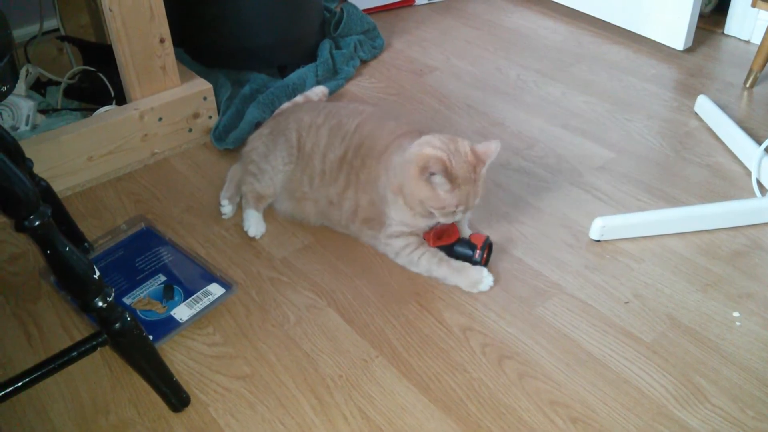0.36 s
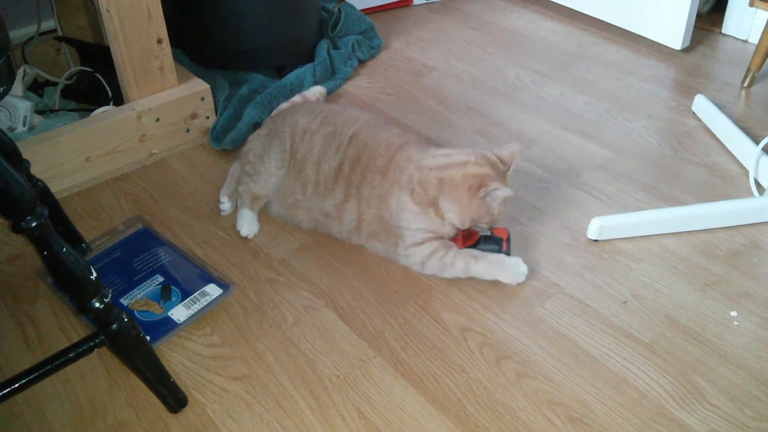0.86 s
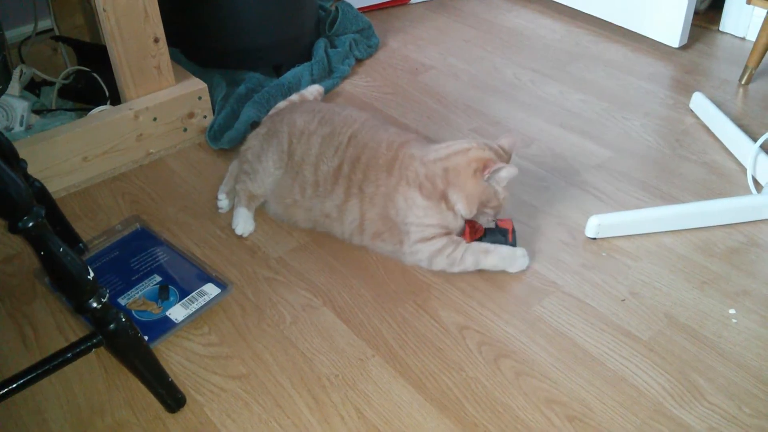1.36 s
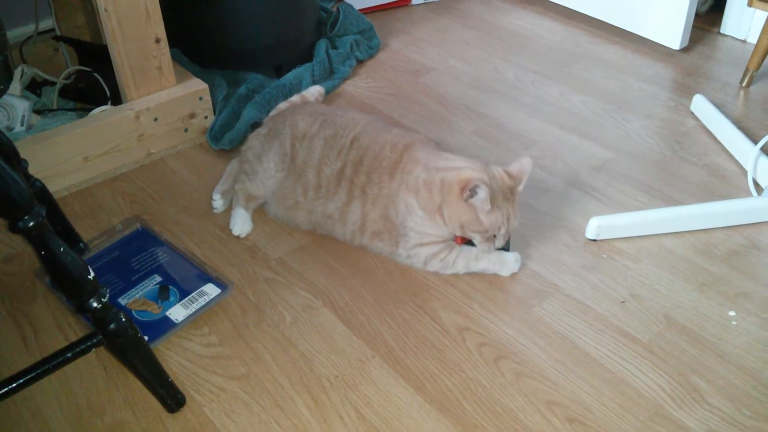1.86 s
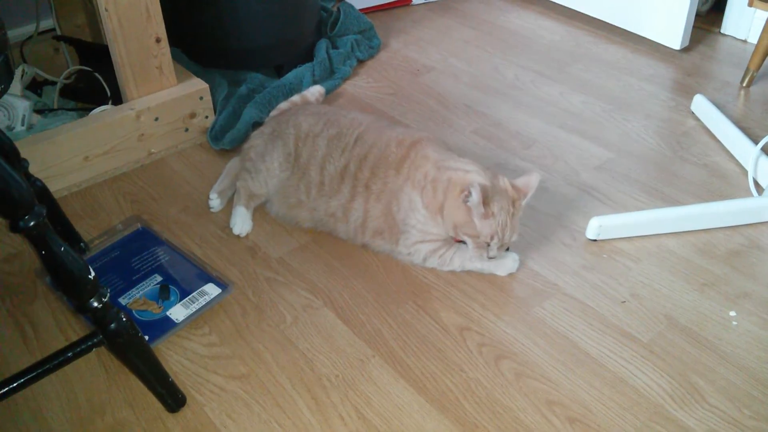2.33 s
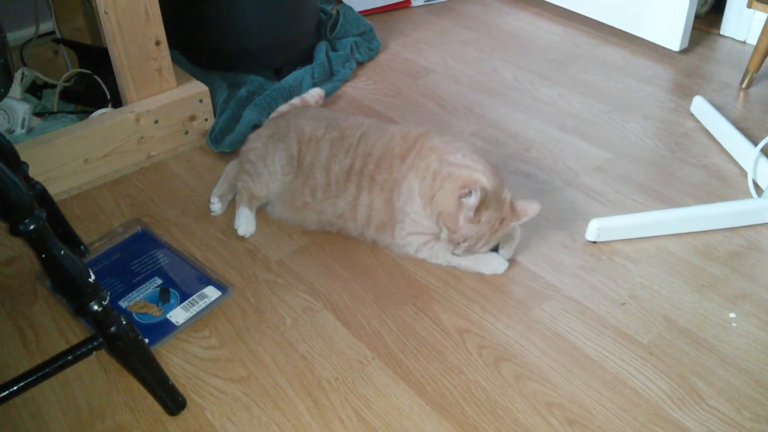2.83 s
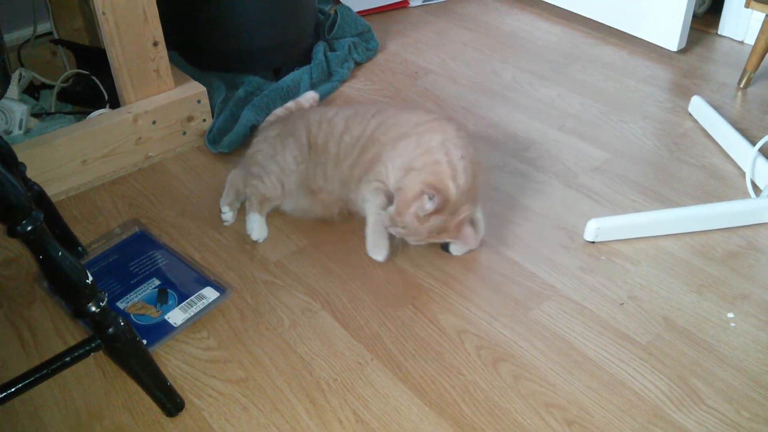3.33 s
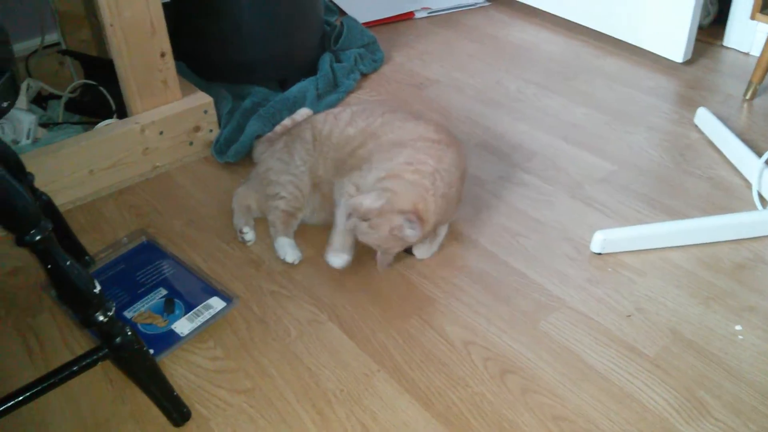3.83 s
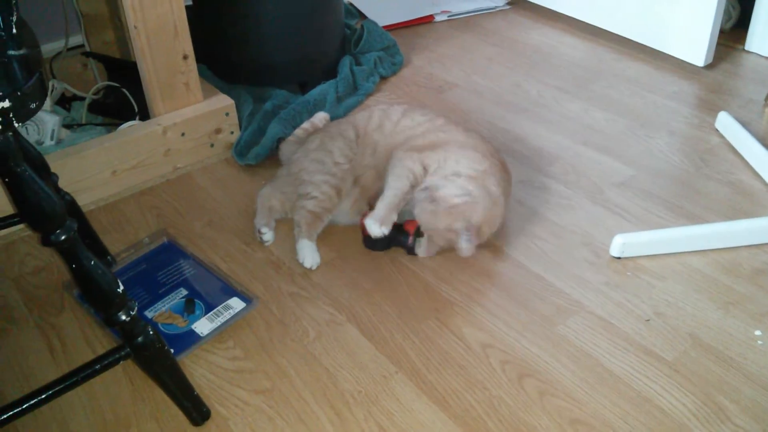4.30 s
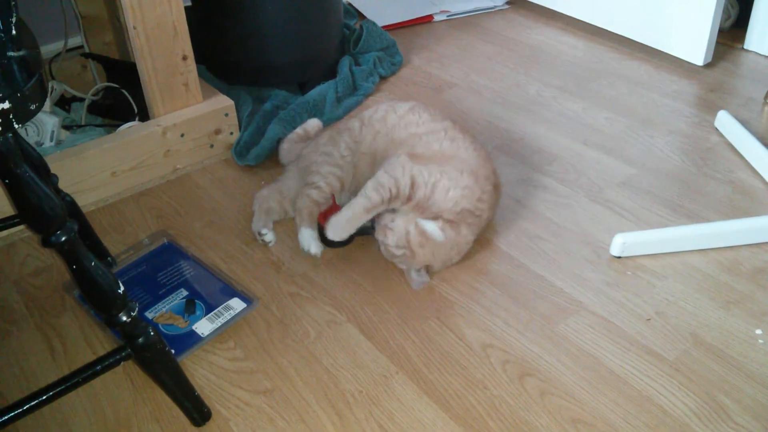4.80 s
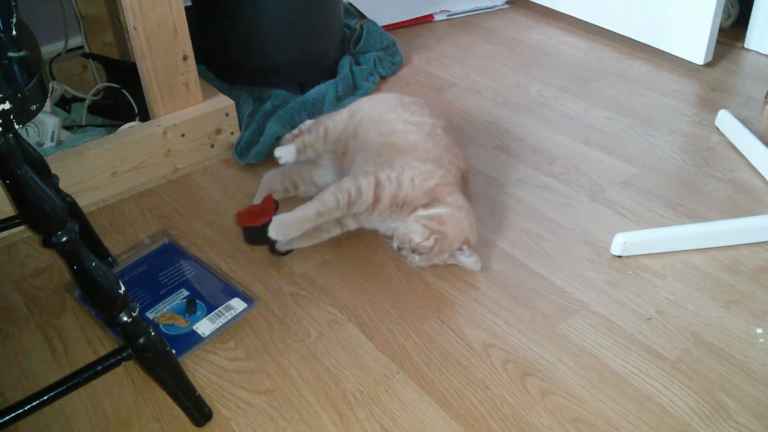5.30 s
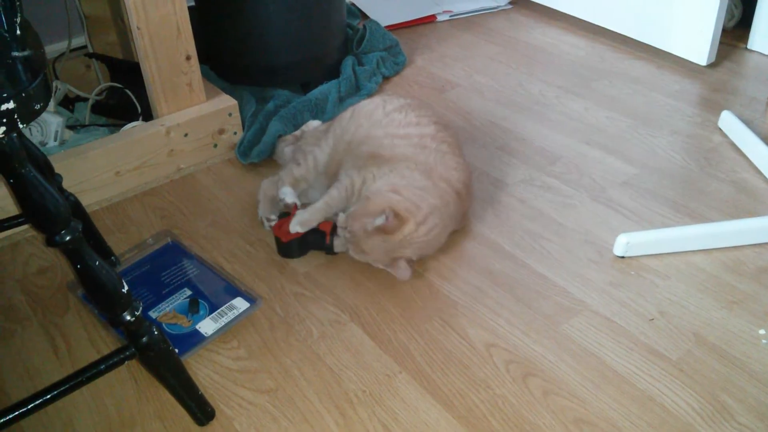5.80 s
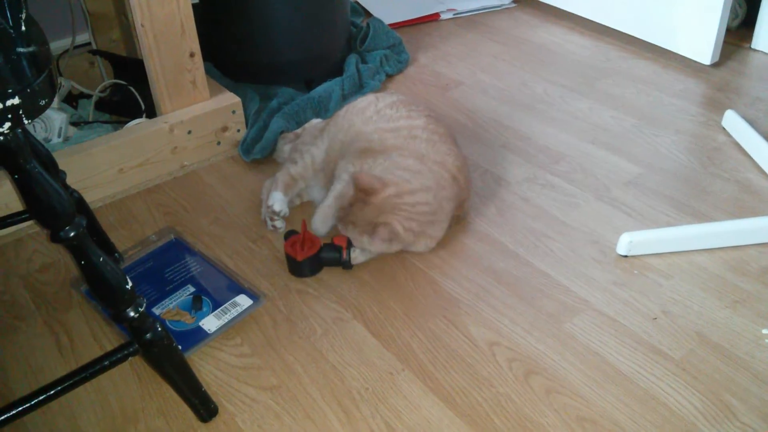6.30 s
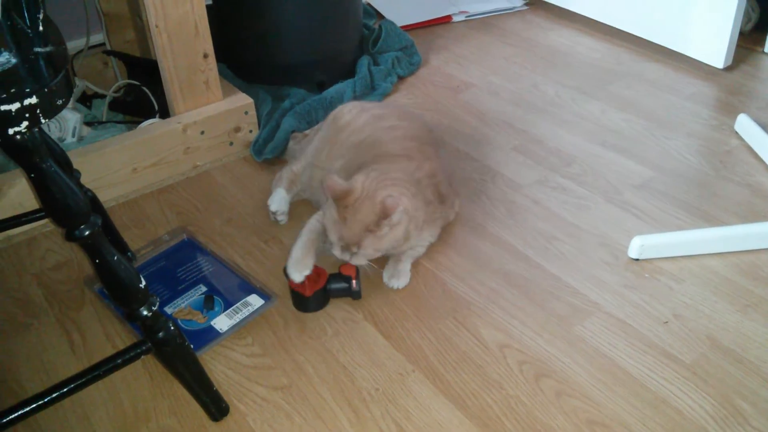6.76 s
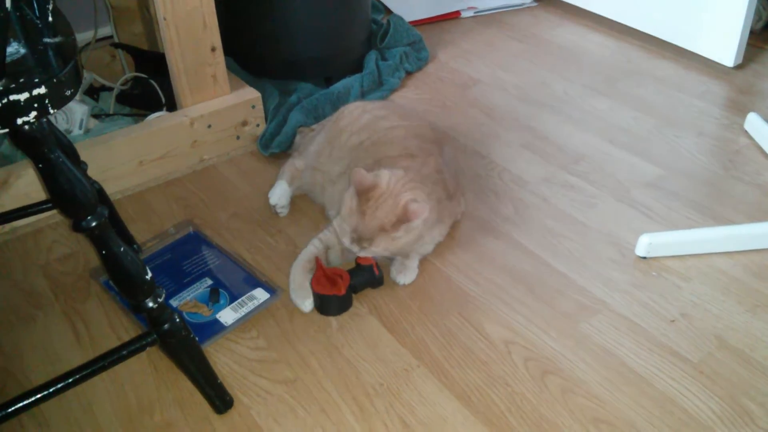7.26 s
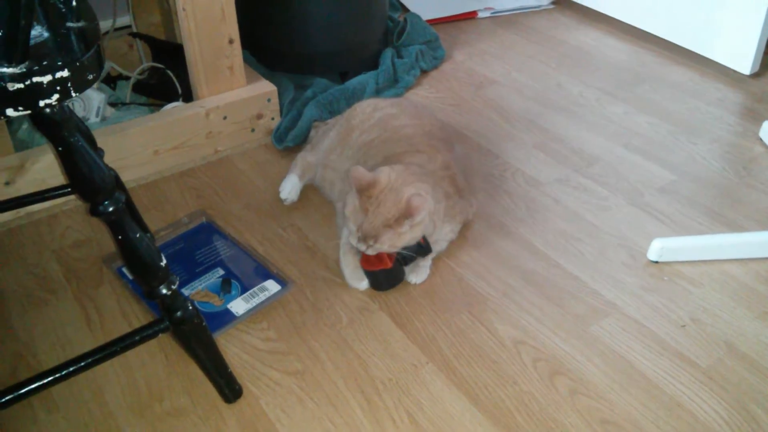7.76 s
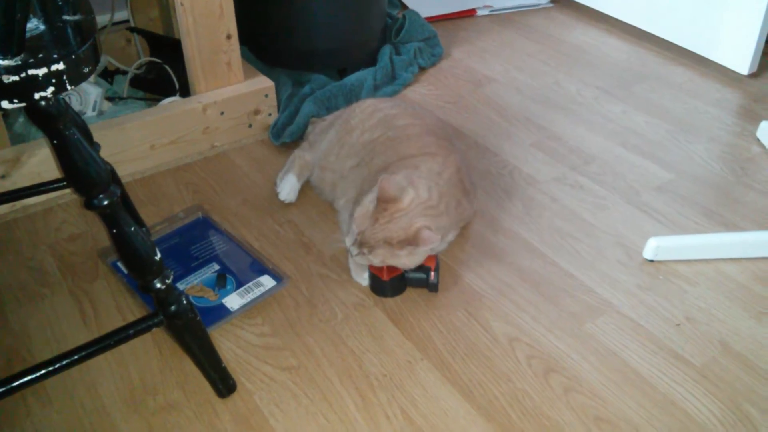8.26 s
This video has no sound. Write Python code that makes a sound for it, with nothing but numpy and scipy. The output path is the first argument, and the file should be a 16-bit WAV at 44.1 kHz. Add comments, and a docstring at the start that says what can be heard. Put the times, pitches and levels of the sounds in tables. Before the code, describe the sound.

A cat paws a hollow plastic valve on a laminate floor. Quiet lumpy room hum and soft scrapes come first, with a few light clacks and thin squeaks. After a lull, knocks and drags return, crowding into a loud rattling tumble midway, then spacing out until one hard closing clack. Small, lively room, picked up close by a handheld phone with faint low bumps.

```python
"""A quiet, lumpy household hum with a soft scrape comes first, then knocks, rattles and more dragging:
a cat nudges, paws and rolls a hollow plastic valve over a laminate floor in a small, lively room.
Knocks and dragging ring the boards and the bore of the valve (low modes) and its shell (high modes).
Dense, fading noise stands for the room's answer. A few thin squeaks join in,
and the hand bumps the phone now and then, as short, low, dying tones."""
import sys
import numpy as np
from scipy import signal
from scipy.fft import rfft, irfft
from scipy.io import wavfile
from scipy.ndimage import uniform_filter1d

SR = 44100
rng = np.random.default_rng(int(sys.argv[2]) if len(sys.argv) > 2 else 0)


def ratio(d):
    """dB to gain"""
    e = np.asarray(d, float) / 20
    return 10 ** e


def to_wav(s):
    """Save 16-bit WAV."""
    ch = np.atleast_2d(s).T  # columns
    pcm = np.round(np.clip(ch, -1, 1) * 32767)  # PCM
    wavfile.write(sys.argv[1], SR, pcm.astype(np.int16))


N = 369488
TIME = np.arange(N) / SR

# All levels in the tables are relative, ahead of the filters and the final gain.
# Colour of the household hum: f/Hz, level/dB
HUM_COLOUR = [(15, -43), (25, -10), (134, -2), (236, 6), (439, -14.5), (531, -0.5), (775, -10), (863, -11),
              (1160, -7.5), (2760, -41), (3920, -68), (5140, -29), (8360, -32.5), (14800, -35.5),
              (16000, -37)]
# Hand against phone: t/s, level/dB before the decay, f/Hz
HAND_BUMPS = [(1.719, -42, 59), (3.559, -48, 60), (7.55, -31, 60.3)]
# How the room answers in each band: f/Hz, time to fade by 60 dB/s, level/dB
ROOM_BANDS = [(151, 0.53, -8.5), (400, 0.34, 0.5), (935, 0.31, 0), (2500, 0.28, -12.5), (5000, 0.41, -4),
              (8660, 0.87, -21.5), (14200, 0.22, -25)]
# Plastic sticking on the varnish: start t/s, length/s, f/Hz, level/dB
SQUEAK_EVENTS = [(0.78, 0.066, 1950, -67), (0.938, 0.043, 1935, -49.5), (1.11, 0.036, 2050, -50),
                 (6.12, 0.11, 1700, -52)]
# Drags: strongest moment t/s, rise/s, fall/s (each spans 20 dB), boards level/dB, shell level/dB
SCRAPE_EVENTS = [(0.0, .05, 0.1, -45.5, -64), (0.581, 0.025, 0.23, -52, -67),
                 (.79, 0.035, 0.073, -47.5, -52.5), (.98, .05, 0.12, -50, -55),
                 (1.16, 0.064, 0.039, -45.5, -65), (1.23, 0.041, 0.12, -44, -70),
                 (1.42, 0.047, 0.08, -40, -54), (1.72, 0.015, 0.067, -69, -90), (2.95, 0.21, 0.1, -59, -75),
                 (3.211, 0.054, 0.099, -50, -57), (3.29, 0.085, .12, -41, -57.5),
                 (3.62, 0.18, 0.17, -38.5, -47), (3.87, 0.082, 0.07, -45, -59.5),
                 (4.09, 0.054, 0.037, -50, -74), (4.33, 0.13, 0.087, -46.5, -67),
                 (4.409, 0.025, .04, -31, -42.5), (4.49, 0.049, 0.17, -31.5, -49),
                 (4.59, 0.056, 0.058, -38, -59), (4.738, 0.13, 0.071, -32.5, -39),
                 (4.93, 0.2, 0.053, -48, -67), (5.12, 0.044, 0.043, -30, -38.5),
                 (5.158, 0.028, 0.048, -18.5, -29.5), (5.2, .03, 0.065, -27, -36),
                 (5.299, 0.041, 0.093, -22.5, -32), (5.38, 0.061, 0.056, -41.5, -47),
                 (5.549, 0.099, 0.13, -35.5, -47), (5.69, 0.11, 0.15, -37.5, -43),
                 (5.92, 0.069, 0.051, -43.5, -56.5), (6.17, 0.16, 0.13, -50, -65),
                 (6.49, 0.072, 0.082, -40, -46), (6.719, 0.058, 0.15, -39.5, -41),
                 (6.99, 0.048, 0.13, -33.5, -46.5), (7.442, 0.041, 0.087, -40, -46.5),
                 (7.621, 0.039, 0.073, -38.5, -54.5), (7.68, 0.05, 0.098, -35.5, -50),
                 (7.96, 0.045, 0.091, -55, -66), (8.218, 0.017, 0.08, -33.5, -29)]
# Constant shuffling: boards level/dB, shell level/dB, hiss level/dB
SHUFFLE_DB = (-60.5, -79, -71.5)
# Knocks: t/s, shell level/dB, boards level/dB, crack level/dB, favoured shell f/Hz
KNOCKS = [(0.5464, -69, -35, -69, 2500), (0.591, -32, -47, -66, 5770), (0.776, -32, -59, -39, 5100),
          (0.9457, -55, -31, -52, 2930), (0.989, -22, -54, -39, 5640), (1.1764, -14, -59, -40, 5560),
          (1.3901, -14.5, -52, -38, 5330), (1.4104, -26, -23, -57, 5480), (1.711, -64, -45, -71, 4510),
          (1.8264, -71, -44, -71, 5330), (1.9536, -50, -36.5, -58, 5970), (3.298, -56, -47, -58, 4320),
          (3.5654, -43, -22.5, -40, 4910), (3.6227, -28, -40, -26, 5090), (3.6986, -30.5, -49, -51, 4860),
          (4.2741, -53, -25, -61, 4740), (4.3968, -13.5, -8, -46, 5500), (4.4593, -24, -20, -49, 5570),
          (4.4706, -15, -11, -49, 3000), (4.5064, -25, -35, -58, 2980), (4.5976, -30, -34, -58, 5320),
          (4.7583, -19, -13.5, -65, 2980), (4.8948, -38, -32, -32.5, 5370), (4.9086, -45, -29.5, -62, 3020),
          (5.0904, -22.5, -32, -36, 5610), (5.1394, 1, 2.5, -11, 2870), (5.1696, -11, -31, -38, 4280),
          (5.2194, -19, -35, -14, 4690), (5.2732, -8, -9.5, -33, 3180), (5.2933, -15, -15, -25, 5650),
          (5.5074, -36, -29, -50, 5030), (5.5249, -21.5, -17.5, -57, 3020), (5.5602, -32, -45, -51, 5780),
          (5.575, -21, -36, -26, 5750), (5.5895, -34, -21.5, -48, 5470), (5.66, -28, -19.5, -55, 4630),
          (5.7597, -15, -48, -26, 5870), (6.2194, -53, -53, -61, 5640), (6.2778, -38.5, -47, -37, 5550),
          (6.411, -64, -26, -56, 5440), (6.4531, -29, -36, -31, 5540), (6.597, -24.5, -54, -57, 3970),
          (6.6787, -30, -19.5, -31, 4760), (6.6907, -23.5, -25.5, -26, 4690), (6.9538, -61, -20, -55, 5430),
          (6.9765, -40, -17, -30, 5500), (6.9986, -25.5, -29, -38, 3030), (7.3862, -24.5, -17.5, -31, 4340),
          (7.5547, -58, -44, -38, 4680), (7.5937, -58, -29.5, -47, 5460), (7.6168, -41, -42, -39, 4060),
          (7.6466, -23, -13.5, -50, 4900), (7.7627, -39, -34, -62, 5000), (7.9394, -59, -34, -63.5, 2740),
          (8.1985, 1, 3, -5, 3950)]
# How the valve lies: t/s, favoured low f/Hz, share spilling to the other board modes [ratio]
VALVE_POSE = [(0, 576, 0.28), (0.3, 400, 0.33), (0.56, 630, 0.14), (1.0, 563, 0.12), (1.17, 410, 0.088),
              (1.36, 410, 0.1), (1.42, 676, 0.16), (1.6, 503, 0.43), (3.0, 398, 0.38), (3.3, 600, 0.07),
              (3.6, 770, 0.073), (3.85, 584, 0.066), (4.6, 536, 0.13), (4.75, 400, 0.081), (5.05, 330, .2),
              (5.14, 730, 0.96), (5.27, 746, 0.86), (5.3, 490, 0.65), (5.6, 530, 0.22), (5.9, 510, 0.055),
              (6.15, 418, 0.14), (6.45, 520, 0.081), (6.7, 586, 0.11), (7.0, 477, 0.16), (7.36, 500, 0.14),
              (7.4, 760, 0.15), (7.46, 580, 0.21), (7.649, 517, 0.04), (8.1, 497, 0.15), (8.2, 513, 0.32)]
# Ringing of the boards and the bore: f/Hz, level/dB, time to fade by 60 dB/s
BOARD_MODES = [(197, -37, 0.035), (234, -1.5, 0.19), (330.5, -13, 0.072), (394.5, -2.5, 0.097),
               (463.4, -0.5, 0.074), (534.2, 5.5, 0.037), (609, 5, 0.043), (691, 3, 0.051),
               (751.6, 4.5, 0.044), (877, 12.5, 0.025), (1091, 4, 0.021), (1332, 1.5, 0.016),
               (1513, 1, 0.02), (1680, -0.5, 0.014), (1840, -12.5, 0.021), (2050, -41, 0.022)]
# Ringing of the plastic shell: f/Hz, level/dB, time to fade by 60 dB/s
SHELL_MODES = [(2730, -9, 0.031), (3042, -12.5, 0.066), (3322, 0, 0.012), (3665, -7, 0.028),
               (4024, -1, 0.023), (4350, 3.5, 0.014), (4680, 3.5, 0.02), (4997, 10, 0.0072),
               (5285, 5.5, 0.014), (5615, 10.5, 0.0083), (5980, -6, 0.029), (6220, -14.5, 0.021)]
# Very short ringing of the cracking edge: f/Hz, level/dB, time to fade by 60 dB/s
CRACK_MODES = [(8200, 1.5, 0.0018), (8770, 10, 0.0021), (10340, 12, 0.0011), (10700, -31, 0.0034),
               (13000, -30, .0025), (14800, -30, 0.0031)]


def set_rms(x, db):
    """Scale a sound to an rms level in dB."""
    return x * ratio(db) / np.sqrt(np.mean(x ** 2))


def walk(rate):
    """Slow random drift: levels held 1 / rate s and smoothed twice; spread near 1."""
    hold = int(SR / rate)
    steps = np.repeat(rng.standard_normal(N // hold + 1), hold)
    return 1.414 * uniform_filter1d(uniform_filter1d(steps, hold), hold)[:N]


def dull(x, hz):
    """Low-pass filter: takes away the sound above hz."""
    return signal.sosfilt(signal.butter(3, hz, fs=SR, output="sos"), x)


def hum():
    """Third-octave bands of household noise; the low-middle ones come in short lumps."""
    f = np.maximum(np.fft.rfftfreq(N, 1 / SR), 1)
    colour_hz, colour_db = np.transpose(HUM_COLOUR)
    colour = ratio(np.interp(np.log(f), np.log(colour_hz), colour_db))
    spectrum = rfft(rng.standard_normal(N)) * colour
    edges = 20 * 2 ** (np.arange(31) / 3)
    out, swell = 0, walk(2.36)  # all bands share the swell
    for lo, hi in zip(edges[:-1], edges[1:]):
        band = irfft(spectrum * ((f >= lo) & (f < hi)), N)
        lumps_db = 3.0 if 150 < lo < 2000 else 0.8
        out = out + band * ratio(lumps_db * walk(16) + 0.38 * swell)
    return set_rms(out, -51.5)


def bumps():
    """Dull thumps through the phone's case: low tones that die away at once."""
    out = np.zeros(N)
    for start_s, db, hz in HAND_BUMPS:
        t = np.maximum(TIME - start_s, 0)
        out += ratio(db) * np.sin(2 * np.pi * hz * t) * np.exp(-t / 0.011)
    return out


def room(x, gap_s, fill_s):
    """Dense reflections that start after a short gap, fill in and die away band by band."""
    t = np.arange(int(.6 * SR)) / SR
    f = np.maximum(np.fft.rfftfreq(len(t), 1 / SR), 1)
    centres = np.log(np.array(ROOM_BANDS)[:, 0])
    fill = 1 - np.exp(-np.maximum(t - gap_s, 0) / fill_s)
    tail = 0
    for k, (_, t60, db) in enumerate(ROOM_BANDS):
        # neighbouring bands cross-fade in power
        share = np.sqrt(np.interp(np.log(f), centres, np.eye(len(ROOM_BANDS))[k]))
        band = irfft(rfft(rng.standard_normal(len(t))) * share, len(t))
        shape = 10 ** (-3 * t / t60) * fill
        tail = tail + ratio(db) * band * shape / np.sqrt(np.sum(shape ** 2))
    return signal.fftconvolve(x, tail)[:N]


def squeaks():
    """Brief thin squeaks as plastic sticks on the varnish: swelling tones of wavering pitch."""
    out = np.zeros(N)
    wobble = np.cumsum(0.0253 * walk(120)) / SR  # time slips, so the pitch wavers
    for start_s, length, hz, db in SQUEAK_EVENTS:
        swell = np.sin(np.pi * ((TIME - start_s) / length).clip(0, 1))
        out += ratio(db) * swell * np.sin(2 * np.pi * hz * (TIME + wobble))
    return out


def knock_samples():
    """Sample number of each knock."""
    return (np.transpose(KNOCKS)[0] * SR).astype(int)


def rubbing(scrape_db, knock_db, shuffle_db):
    """Strength of rubbing: scrapes swell and fade, knocks chatter on, shuffling never rests."""
    roundness = 1.3  # 1 = pointed swell, 2 = bell
    rattle_db, rattle_s = -20, 0.011  # chatter against the knock's level; its decay time
    out = ratio(shuffle_db + 4.8 * walk(8))
    for (peak_s, rise, fall, *_), db in zip(SCRAPE_EVENTS, scrape_db):
        away = np.where(TIME < peak_s, (peak_s - TIME) / rise, (TIME - peak_s) / fall)
        out = out + ratio(db - 20 * away.clip(0, 9) ** roundness)
    chatter = np.zeros(N)
    chatter[knock_samples()] = ratio(knock_db + rattle_db)
    return out + signal.lfilter([1], [1, -np.exp(-1 / (rattle_s * SR))], chatter)


def grit(rate, spread_db):
    """Stick-slip: rate tiny catches a second, of either sign, a few much larger; rms 1."""
    size = rng.standard_normal(N) * ratio(spread_db * rng.exponential(size=N))
    return set_rms(size * (rng.random(N) < rate / SR), 0)


def near(hz, centre_hz, octaves):
    """Share of a push that reaches a mode, by its distance in pitch from where the contact favours."""
    return np.exp(-.5 * (np.log2(hz / centre_hz) / octaves) ** 2)


def upper_share(hz, hardness):
    """Hard contact, which favours the shell, also wakes the upper board modes."""
    return 1.69 * np.minimum(hardness, 1) * near(hz, 1700, octaves=0.63)


def ring(force, hz, t60):
    """One decaying mode; a unit push starts a unit swing."""
    r, w = np.exp(-np.log(1000) / (t60 * SR)), 2 * np.pi * hz / SR
    return signal.lfilter([0, np.sin(w)], [1, -2 * r * np.cos(w), r * r], force)


def body(modes, knock_db, knock_share, rub, rub_share, patchy_db):
    """Knocks and rubbing push one set of modes; each knock lands elsewhere, so signs and sizes change."""
    hz, db, t60 = np.transpose(modes)
    at = knock_samples()
    luck = rng.standard_normal((len(at), len(hz)))
    sign = np.sign(rng.standard_normal((len(at), len(hz))))
    push = knock_share * ratio(db + 2.0 * luck) * sign
    push = push * (ratio(knock_db) / np.sqrt(2 * np.sum(push ** 2, axis=1)))[:, None]
    energy = t60 * SR / (4 * np.log(1000))  # of a unit ring
    total = np.sqrt(sum(ratio(2 * db[m]) * energy[m] * rub_share(hz[m]) ** 2 for m in range(len(hz))))
    out = 0
    for m in range(len(hz)):
        patchy = ratio(db[m] + patchy_db * walk(25))
        force = rub * patchy * rub_share(hz[m]) / total
        force[at] += push[:, m]
        out = out + ring(force, hz[m], t60[m])
    return out


def valve():
    """Boards and bore thud, the shell clacks, the edge cracks; dragging excites all three."""
    _, shell_db, boards_db, crack_db, shell_hz = np.transpose(KNOCKS)
    low_db, mid_db = np.transpose(SCRAPE_EVENTS)[3:]
    pose_s, pose_hz, pose_share = np.transpose(VALVE_POSE)
    low_hz = np.interp(TIME, pose_s, pose_hz)
    spill = np.interp(TIME, pose_s, pose_share)
    at = knock_samples()[:, None]
    coarse, fine = grit(2500, spread_db=2.5), grit(9000, spread_db=1.0)
    low = rubbing(low_db, boards_db, SHUFFLE_DB[0])
    mid = rubbing(mid_db, shell_db, SHUFFLE_DB[1])
    hiss = rubbing(-27.5 + .65 * mid_db, crack_db, SHUFFLE_DB[2])  # hiss follows the shell's scrapes

    board_hz = np.array(BOARD_MODES)[:, 0]
    hardness = ratio(shell_db - boards_db)[:, None]
    board_share = 1.5 * spill[at] + near(board_hz, low_hz[at], octaves=0.22)
    board_share = board_share + upper_share(board_hz, hardness)

    def board_rub_share(hz):
        """Share of the dragging that reaches a board mode, moment by moment."""
        return spill + near(hz, low_hz, octaves=0.25) + upper_share(hz, mid / low)

    boards = body(BOARD_MODES, boards_db, board_share, coarse * low, board_rub_share, patchy_db=2.5)
    shell_share = 0.1 + near(np.array(SHELL_MODES)[:, 0], shell_hz[:, None], octaves=0.23)
    shell = body(SHELL_MODES, shell_db, shell_share, fine * mid, lambda hz: 1, patchy_db=3.5)
    # soft contact pushes little above 11250 Hz in the hiss and 2980 Hz in the boards
    crack = body(CRACK_MODES, crack_db, 1, dull(fine, 11250) * hiss, lambda hz: 1, patchy_db=1.5)
    return dull(boards, 2980) + shell + crack


def scene():
    """The valve and its squeaks, the room's answer, the hum and the hand."""
    # the valve and squeaks are thinned below 149 Hz
    low_cut = signal.butter(3, 149, "high", fs=SR, output="sos")
    close = signal.sosfilt(low_cut, valve() + squeaks())
    echo = room(close, gap_s=0.0021, fill_s=0.0028)
    return (close + echo + hum() + bumps())[None]


def low_pass(x):
    """Removes everything above the highest recorded frequency."""
    return signal.sosfilt(signal.butter(12, 16650, fs=SR, output="sos"), x)


def record(dry):
    """The phone rounds the loudest peaks and cuts the top above 15800 Hz."""
    rounded = np.tanh(dry) / 1.312
    top_cut = signal.ellip(6, .3, 40, 15800, fs=SR, output="sos")
    mix = signal.sosfilt(top_cut, rounded)
    return low_pass(mix)


dry = scene()
out = record(dry)
to_wav(out)
```